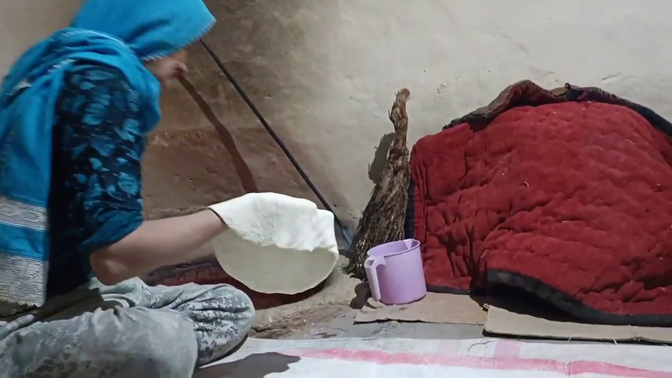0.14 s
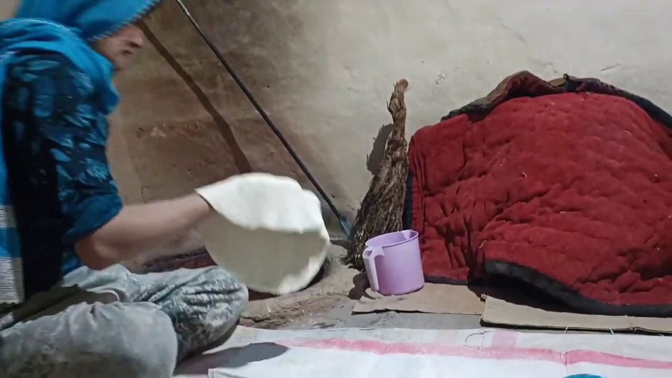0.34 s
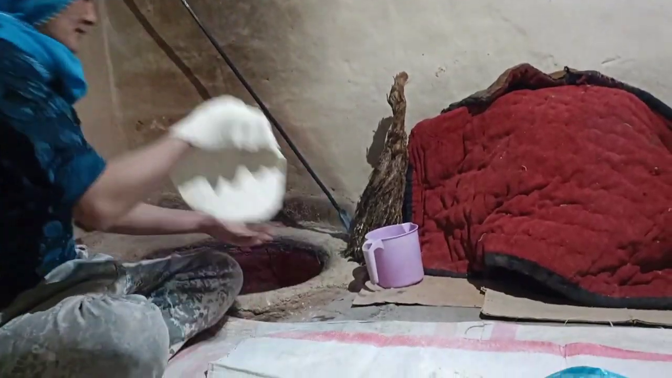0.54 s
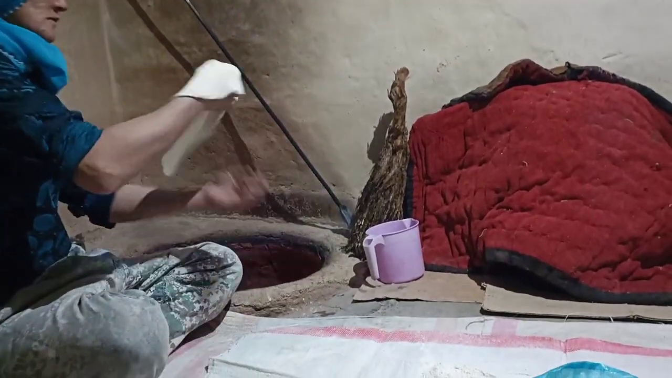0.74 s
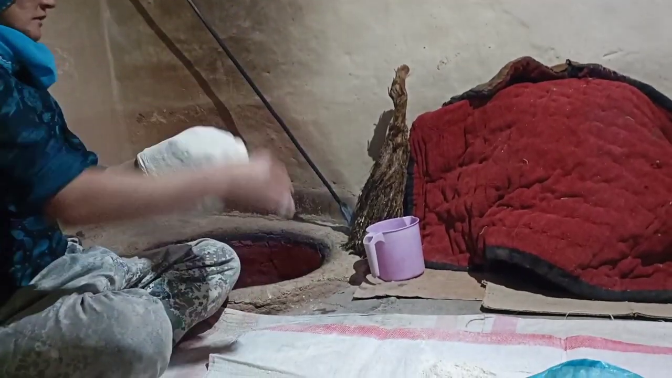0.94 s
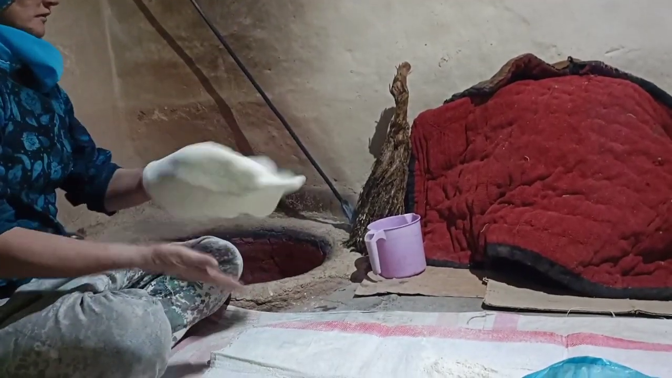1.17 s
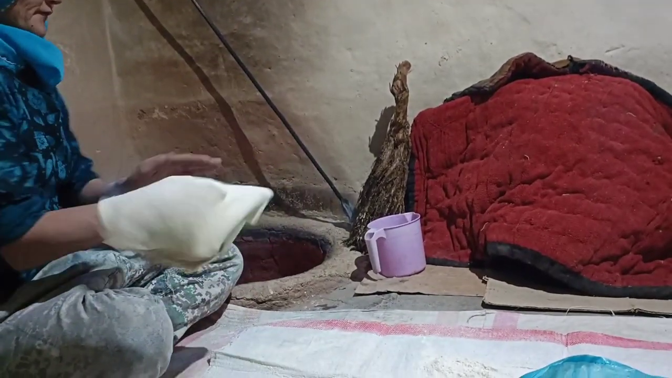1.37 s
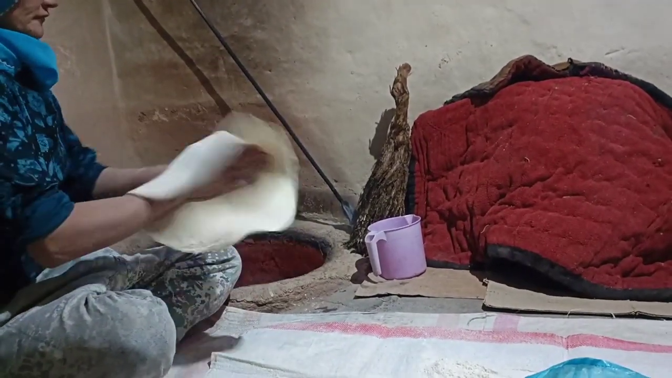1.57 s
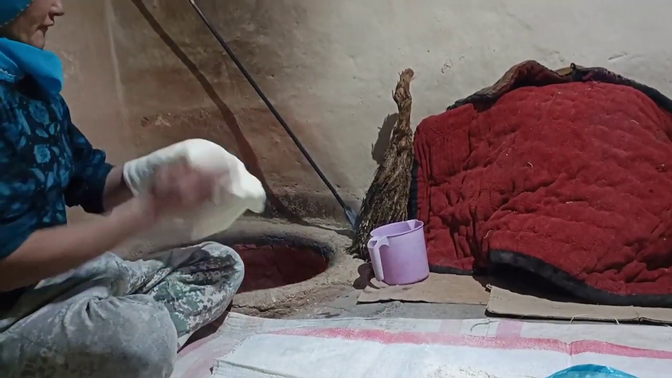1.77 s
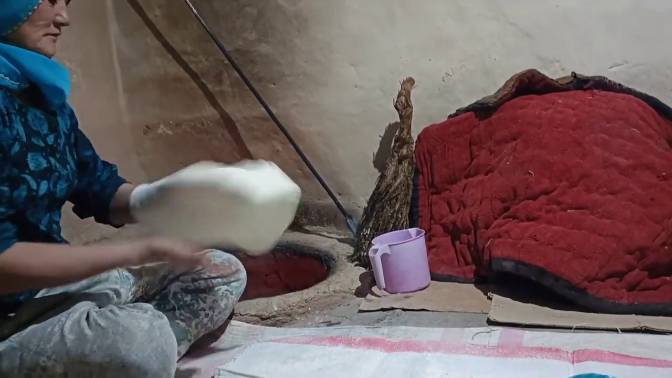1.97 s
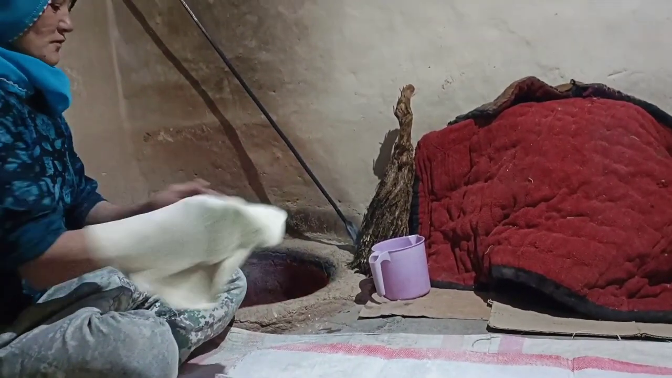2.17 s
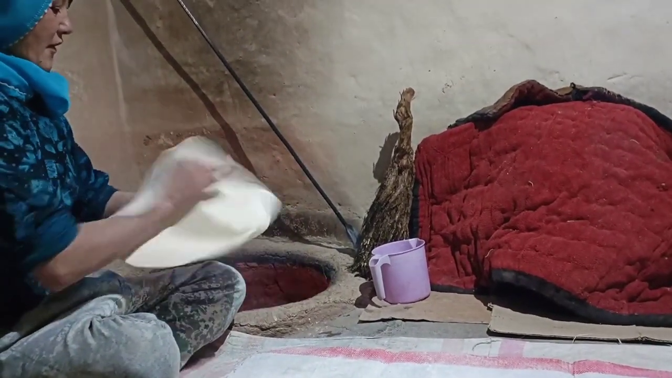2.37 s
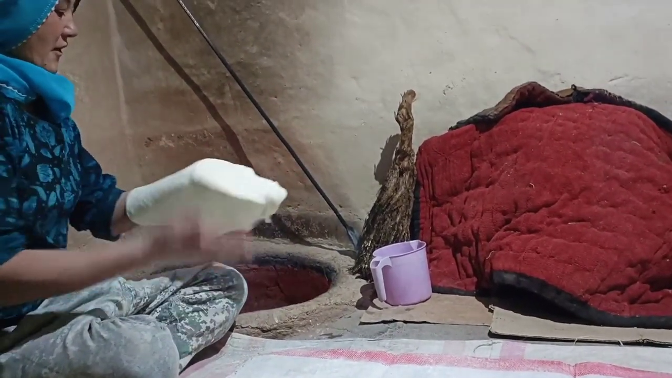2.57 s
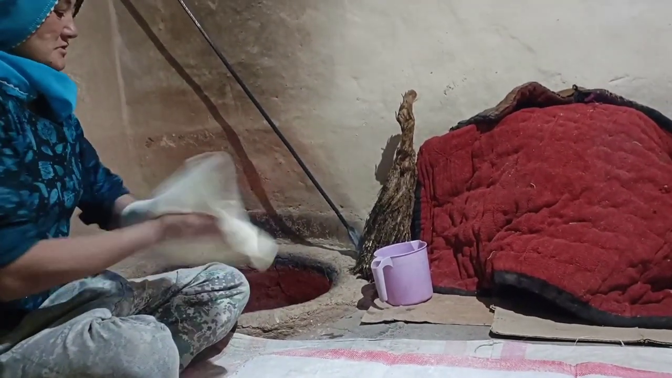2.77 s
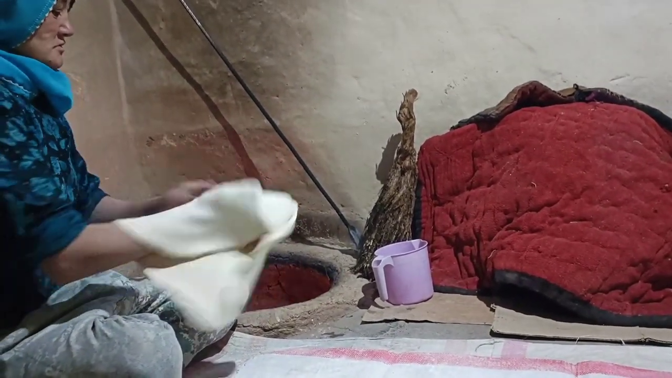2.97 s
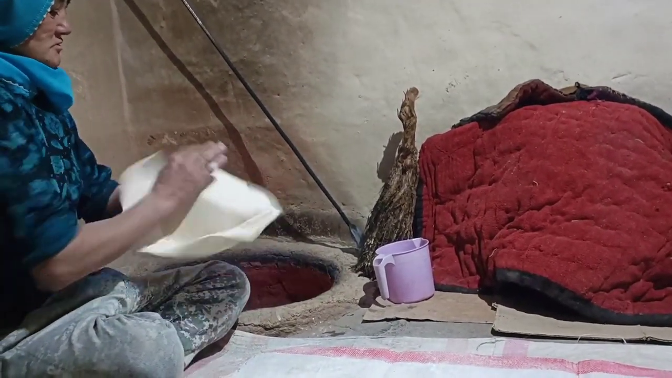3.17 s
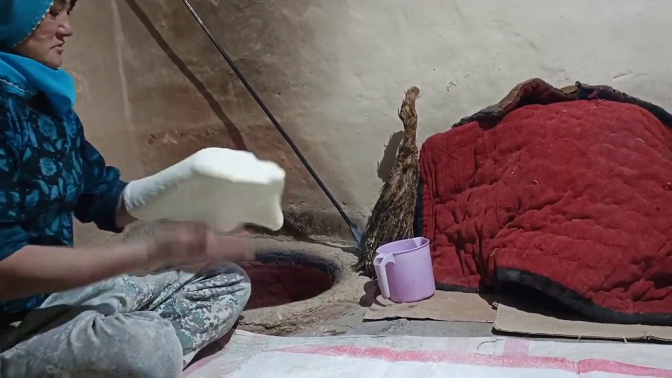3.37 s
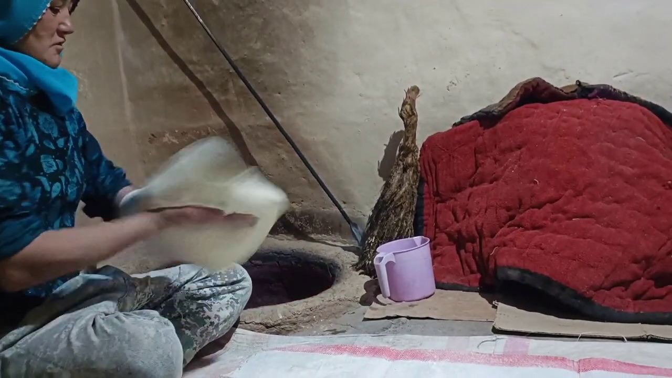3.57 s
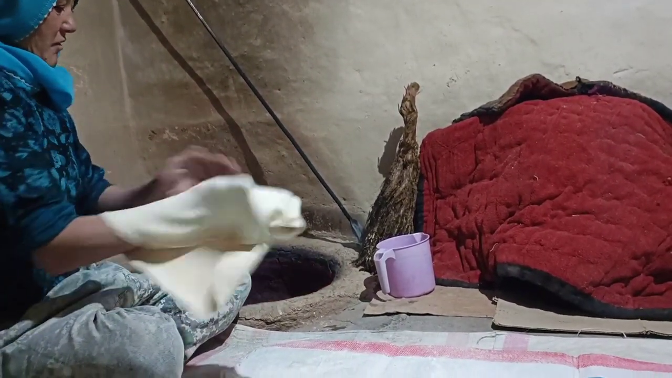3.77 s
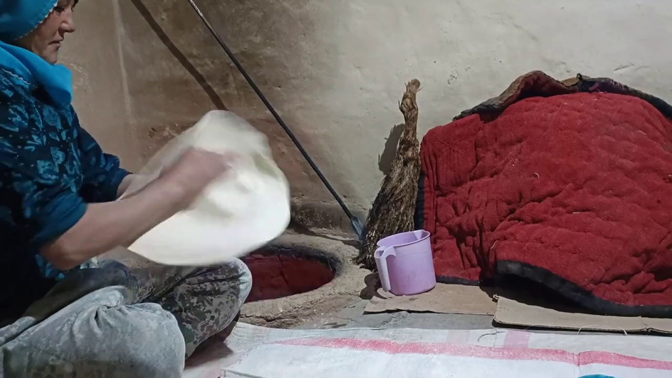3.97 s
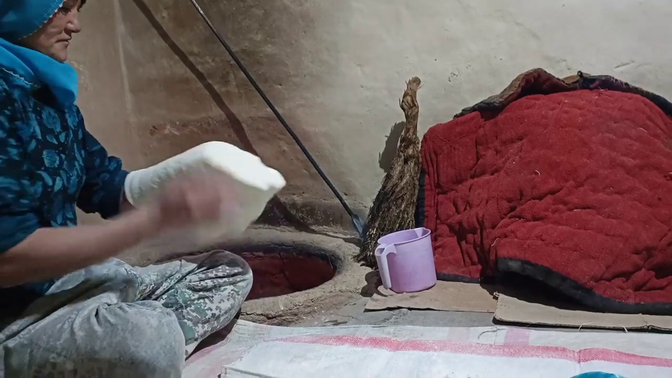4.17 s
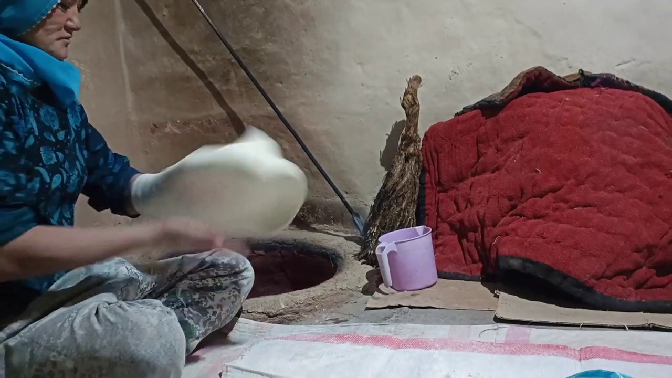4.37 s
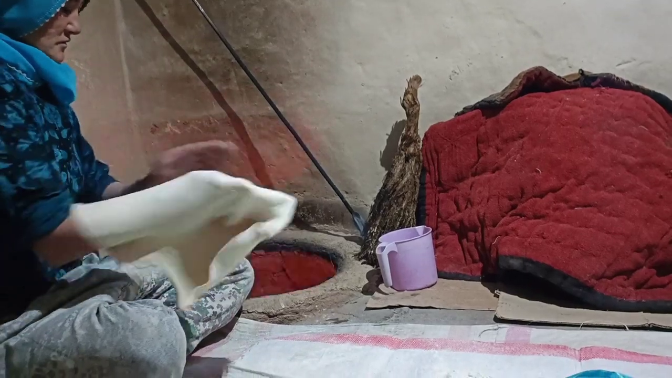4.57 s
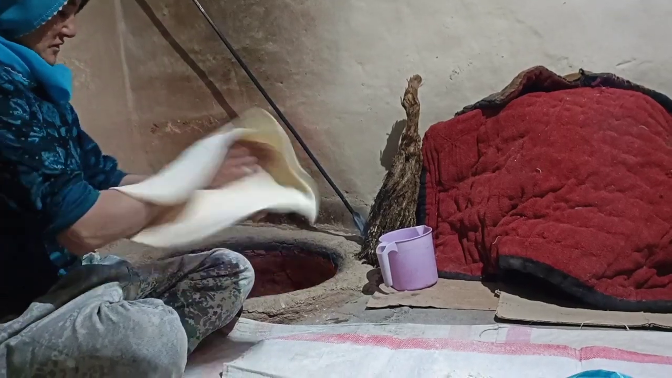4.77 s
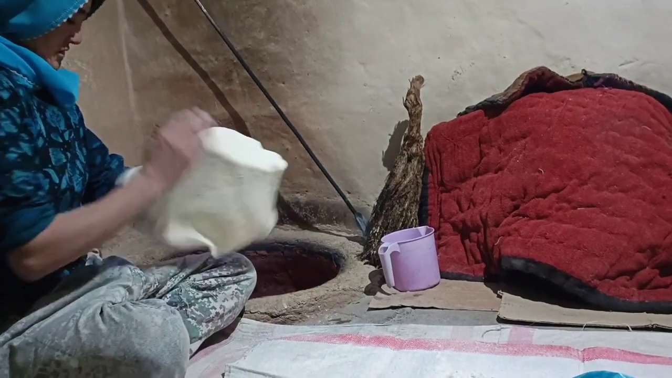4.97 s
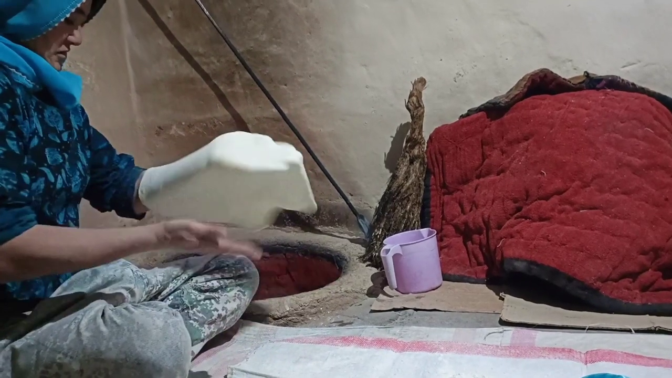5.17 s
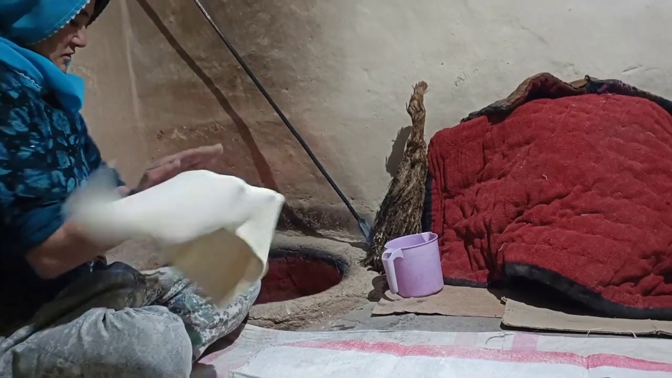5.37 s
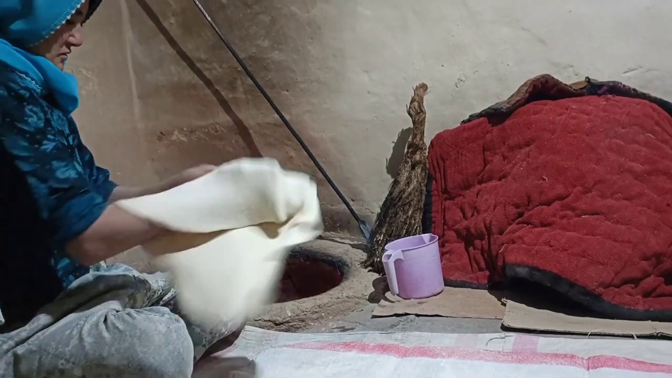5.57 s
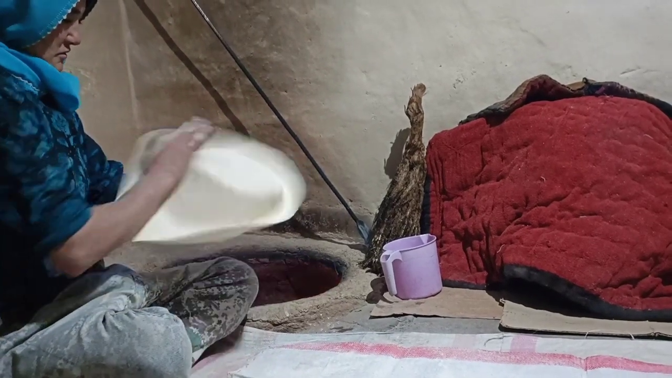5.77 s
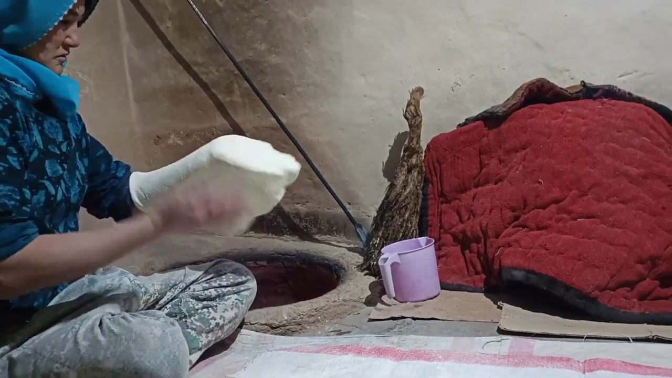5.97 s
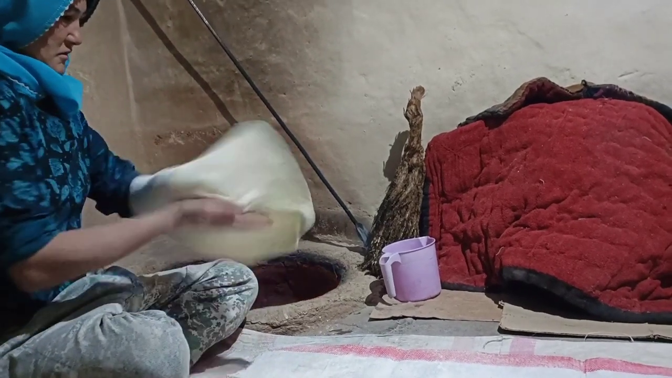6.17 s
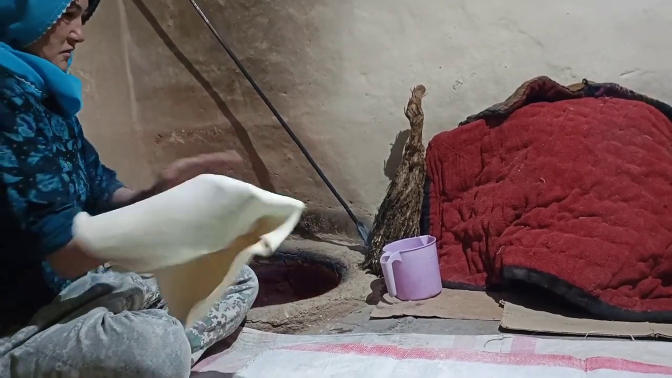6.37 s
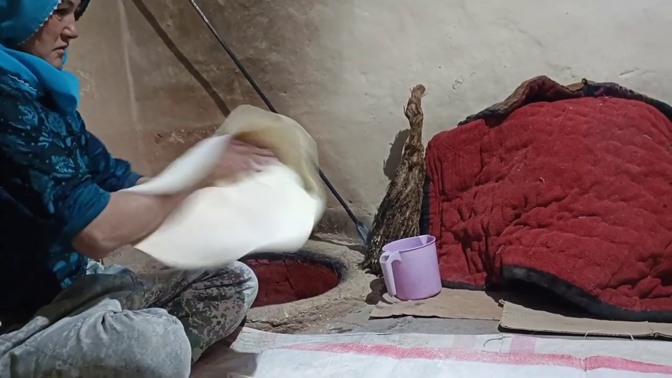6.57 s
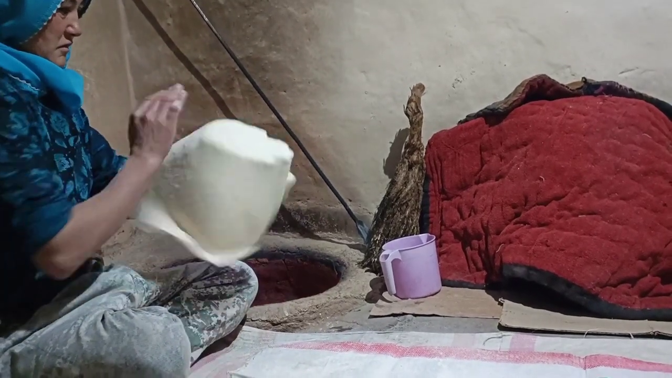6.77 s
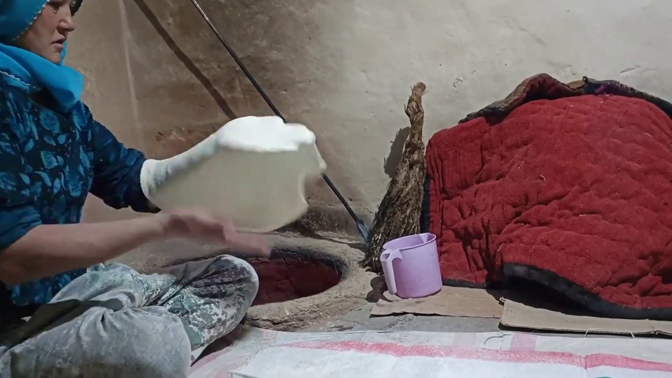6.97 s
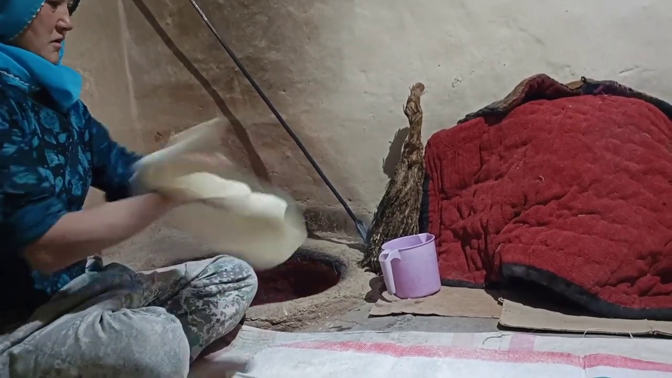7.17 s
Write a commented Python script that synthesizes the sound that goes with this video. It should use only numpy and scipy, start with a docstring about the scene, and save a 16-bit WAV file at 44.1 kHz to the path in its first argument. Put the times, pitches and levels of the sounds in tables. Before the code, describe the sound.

Close stereo pickup in a small, quiet clay-walled room. Floury dough first hisses softly over skin, with tiny sticky ticks; then a flat sheet is tossed between palms. Each round has a cupped pat, a heavier slap with a low thump, and a loose edge flapping after it. Slaps near three and four seconds are loudest and brightest. A clay oven's hollow answers faintly.

```python
"""First comes a fine hiss of floury dough sliding over skin: shaped noise that swells and dies with each stroke.
Then a sheet of bread dough is flung from palm to palm above a clay floor oven in a small room.
A soft catch, a cupped pat, a slap and a flapping edge are each a push of air, many tiny contacts and a short ring.
The hollow of the oven answers some catches with breathy, gliding noise; the still air of the room lies under all."""
import sys
import numpy as np
from scipy import signal
from scipy.fft import rfft, irfft, next_fast_len
from scipy.io import wavfile
from scipy.ndimage import uniform_filter1d

SR = 44100
rng = np.random.default_rng(int(sys.argv[2]) if len(sys.argv) > 2 else 0)


def persist_wave(psi):
    """Save psi, clipped to +-1, as 16-bit WAV."""
    counts = np.round(np.clip(psi, -1, 1) * 32767).astype(np.int16)
    wavfile.write(sys.argv[1], SR, np.atleast_2d(counts).T)


N = 318843  # length of the scene [samples]


def amp(db):
    """Turns decibels into a gain."""
    return 10 ** (np.asarray(db) / 20)


def evened(x):
    """Scales a sound to an average strength (rms) of 1."""
    return x / np.sqrt(np.mean(x ** 2) + 1e-20)


def read(points, hz):
    """Reads a table between its points, on a log-frequency axis."""
    f, value = np.transpose(points)
    return np.interp(np.log(hz + 1), np.log(f + 1), value)


def add(mix, s, sound):
    """Adds a stereo sound into the mix at time s."""
    part = mix[:, max(round(s * SR), 0):][:, :sound.shape[1]]
    part += sound[:, :part.shape[1]]


# how alike the noise is at the two microphones: (frequency [Hz], likeness [0 to 1])
LIKENESS = [(100, .985), (300, .86), (600, .58), (1200, .32), (2500, .2), (16000, .1)]


def diffuse(size):
    """Spectra of white noise at two microphones: nearly the same in the bass, different in the treble."""
    hz = np.fft.rfftfreq(size, 1 / SR)
    left, other = rfft(rng.standard_normal((2, size)))
    same = np.clip(read(LIKENESS, hz), -1, 1)
    right = same * left + np.sqrt(1 - same ** 2) * other
    return hz, np.array([left, right])


def noise(colour):
    """Stereo noise of a given colour, rms 1."""
    size = next_fast_len(N)
    hz, spectra = diffuse(size)
    coloured = irfft(spectra * amp(read(colour, hz)), size)
    return evened(coloured[:, :N])


def wander(rate_hz):
    """Random ups and downs: straight lines between random points, rate_hz points a second."""
    knots = rng.standard_normal(N // 20)
    return np.interp(np.arange(N) * rate_hz / SR, np.arange(len(knots)), knots)


# colour of the still air in the room: (frequency [Hz], level [dB])
STILL_AIR = [(12, -41.5), (20, 7.5), (65, 10.5), (204, 1), (328, 1.5), (459, -9.5), (873, -1.5), (1710, -9),
             (2320, -2.5), (3440, -8.5), (5380, -3.5), (7950, -15), (13900, -11), (16000, -10)]
STILL_AIR_DB = -66.5  # level before the sway


def still_air(sway_db=1, sway_hz=6):
    """The faint rumble and hiss of the room: steady coloured noise whose level sways a little."""
    return noise(STILL_AIR) * amp(STILL_AIR_DB + sway_db * wander(sway_hz))


# colour of the powdery hiss: (frequency [Hz], level [dB])
HISS = [(300, -30.5), (1400, -12), (2400, 0.5), (3500, 3), (5400, 9.5), (6600, 6), (7900, -1), (9200, 4),
        (10400, 2.5), (12500, 9), (14000, 4.5), (16000, -7.5)]
# colour of the duller rub: (frequency [Hz], level [dB])
RUB = [(100, -7), (320, 3), (900, -5), (1600, -2.5), (2400, 1), (3600, 0.5), (5400, 3), (6500, -0.5),
       (8000, -8.5), (12000, -13.5)]
# a hand slides along the dough: (time at full speed [s], hold [s], hiss level [dB], rub level [dB])
STROKES = [(0, 0.049, -47, -58), (.12, 0.036, -83, -58.5), (0.349, 0.018, -49.5, -54.5),
           (0.412, 0.14, -47.5, -59), (.66, 0.05, -68, -71), (.985, .025, -35.5, -64),
           (1.62, 0.0069, -81, -57), (1.842, 0.012, -53.5, -47.5), (1.989, 0.037, -44.5, -47.5),
           (2.16, 0.013, -78, -60.5), (2.566, 0.011, -56, -47), (2.779, 0.045, -52, -76),
           (3.335, 0.017, -53.5, -55), (3.42, 0.0088, -58, -52.5), (3.533, 0.044, -58, -74),
           (4.186, 0.062, -45.5, -45), (4.355, 0.0054, -81, -51), (4.87, 0.048, -57, -63),
           (5.036, 0.029, -51.5, -45.5), (5.212, 0.028, -67.5, -60.5), (5.525, 0.067, -50, -56),
           (5.917, 0.044, -52.5, -47.5), (6.092, 0.065, -56, -59), (6.593, 0.022, -61.5, -65),
           (6.833, 0.038, -50, -44.5), (7.003, 0.02, -68, -60)]
GRIP_DB_PER_S, RELEASE_DB_PER_S = 348, 199.5  # how fast a stroke swells and dies
# around every slap: hold [s], hiss level [dB], rub level [dB]
WINDUP_S, WINDUP_HISS_DB, WINDUP_RUB_DB = 0.025, -63.5, -59.5  # the sheet swishes through the air just before
SKID_S, SKID_HISS_DB, SKID_RUB_DB = 0.11, -68, -64.5  # the sheet skids on the palm after it
SWING_S, SWING_HISS_DB, SWING_RUB_DB = 0.336, -70, -67.5  # sleeves rustle until the arms come to rest


def sliding(grain_db=1.6, grain_hz=350, hiss_left_db=0.3, rub_left_db=1.1):
    """Flour grains and sleeves drag over dough and skin: a fine hiss over a duller rub, both slightly uneven."""
    t = np.arange(0, N, 64) / SR  # coarse time steps are enough for the swells
    left = np.array([[1], [-1]])  # louder on the left, softer on the right
    moves = list(STROKES)
    for s, *_ in SLAPS:
        moves.append((s - WINDUP_S, WINDUP_S, WINDUP_HISS_DB, WINDUP_RUB_DB))
        moves.append((s, SKID_S, SKID_HISS_DB, SKID_RUB_DB))
        moves.append((s, SWING_S, SWING_HISS_DB, SWING_RUB_DB))
    power = 0
    for s, hold, hiss_db, rub_db in moves:
        swell_db = -GRIP_DB_PER_S * np.maximum(s - t, 0)
        fade_db = -RELEASE_DB_PER_S * np.maximum(t - s - hold, 0)
        shape_db = swell_db + fade_db
        power = power + amp([hiss_db + shape_db, rub_db + shape_db]) ** 2
    hiss, rub = (np.interp(np.arange(N) / SR, t, np.sqrt(p)) for p in power)
    sound = noise(HISS) * hiss * amp(left * hiss_left_db)
    sound += noise(RUB) * rub * amp(left * rub_left_db)
    return sound * amp(grain_db * wander(grain_hz))


# ways the oven's air can ring: (multiple of its pitch, level [dB], width [Hz], share of the fading time)
OVEN_MODES = [(1.001, 3.5, 20, 0.98), (2.02, -19, 30, 0.48), (3.8, -7.5, 60, 0.6)]
# the oven's hollow answers, its pitch shifting as its mouth is uncovered:
# (time [s], level [dB], first pitch [Hz], last pitch [Hz], swell [s])
HOLLOWS = [(1.60, -55, 340, 507, 0.038), (1.96, -55.5, 528, 594, 0.014), (2.725, -54.5, 557, 571, 0.011),
           (3.482, -38, 576, 546.5, 0.0048), (4.33, -49, 460, 579, 0.035), (5.20, -55.5, 517, 551, 0.022),
           (6.11, -41.5, 517.4, 541.6, 0.0091), (7.02, -60.5, 555, 549, .011)]
HOLLOW_T60_S = 0.38  # time to fade by 60 dB, before each mode takes its share


def oven(glide_s=0.0499):
    """A breathy ring of the air in the clay pot, noise kept near each mode; the upper modes die first."""
    out, t = np.zeros((2, N)), np.arange(SR // 2) / SR
    for s, db, first_hz, last_hz, swell in HOLLOWS:
        shift_hz = (first_hz - last_hz) * np.exp(-t / glide_s)
        glide = np.exp(2j * np.pi * np.cumsum(shift_hz) / SR)
        for multiple, mode_db, width_hz, share in OVEN_MODES:
            hz, spectra = diffuse(len(t))
            resonance = 1 / (1 + ((hz - multiple * last_hz) / (2 * width_hz)) ** 2)
            # positive frequencies only, so that the glide can shift them all
            breath = np.fft.ifft(spectra * resonance, len(t))
            fade_db = -60 * np.maximum(t - swell, 0) / (HOLLOW_T60_S * share)
            fade = np.minimum(t / swell, 1) * amp(fade_db)
            ring = evened((breath * glide).real * fade)
            add(out, s, ring * np.sqrt(np.mean(fade ** 2)) * amp(db + mode_db))
    return out


# how the room fades, where t60 is the time to fall by 60 dB:
# (frequency [Hz], early level [dB], early t60 [s], late level [dB], late t60 [s])
ROOM = [(80, -14, 0.08, -1.5, 0.84), (197, 4, 0.097, -7, 0.2), (525, 5.5, 0.24, -4.5, 0.91),
        (890, 3.5, 0.18, -7.5, 0.7), (2200, 4.5, 0.2, -9, 0.8), (4660, -3.5, 0.16, -13.5, 0.23),
        (12000, 7.5, 0.19, -28, 0.31)]
# standing waves between the walls: (frequency [Hz], width [Hz], boost [dB])
STANDING = [(80, 20, 2), (141.8, 7.3, 11.5), (378, 23, 5), (705, 25, 10.5), (808, 11.45, 10),
            (1185, 41, 5.5), (1304, 20, 3), (1373, 10, 1.5), (2140, 21, 9), (2226, 33, 1)]
# echoes from floor and walls: (delay at left microphone [s], delay at right microphone [s], level [dB])
ECHOES = [(.0011, 0.0014, -21), (.0023, .00215, -20), (.0047, 0.009, -30), (0.0099, .01, -33),
          (0.0113, 0.012, -24)]


def room(size=32768, build_s=0.0011, tail_db=-1):
    """Reflections for one place of the hands: a few echoes, a quick early tail and a faint long one."""
    t = np.arange(size) / SR
    hz, spectra = diffuse(size)
    spectra *= amp(sum(db / (1 + (2 * (hz - f) / width) ** 2) for f, width, db in STANDING))
    centres, out = [row[0] for row in ROOM], np.zeros((2, size))
    for share, (_, early_db, early_t60, late_db, late_t60) in zip(np.eye(len(ROOM)), ROOM):
        band = irfft(spectra * read(list(zip(centres, share)), hz))
        early = amp(2 * early_db - 120 * t / early_t60) / early_t60
        late = amp(2 * late_db - 120 * t / late_t60) / late_t60
        fade = np.sqrt((early + late) * 2 * np.log(1000) / SR)
        tail = band * fade
        # every place returns the same energy
        out += tail * np.sqrt(np.mean(band ** 2) * np.mean(fade ** 2) / np.mean(tail ** 2))
    out *= amp(tail_db) * (1 - np.exp(-t / build_s))
    for left_s, right_s, db in ECHOES:
        out[[0, 1], [round(left_s * SR), round(right_s * SR)]] += amp(db)
    return out


def heard(sound, reflections, lag_s=0.00011):
    """The direct sound, a little later on the left, and its reflections."""
    paths = reflections.copy()
    paths[[0, 1], [round(lag_s * SR), 0]] += 1
    return signal.fftconvolve(sound[None], paths, axes=1)


def pulse(gain):
    """The sharpest pulse with this spectrum that does not start before its cause (minimum phase)."""
    both_halves = np.r_[gain, gain[-2:0:-1]]
    log_gain = np.log(np.maximum(both_halves, 1e-5))
    return np.fft.ifft(np.exp(np.conj(signal.hilbert(log_gain)))).real


def contact(span, t, rise=0.58, fall=0.94, rush_db=-28, rush_s=0.0023, main_db=5, main_s=0.00037, grit=1.21):
    """Air rushes out, then many small folds touch down around one main impact at t = 0."""
    grains = rng.standard_normal(len(t))
    grains = np.sign(grains) * abs(grains) ** grit  # above 1, grit makes strong grains stand out
    touch = np.exp(-abs(t) / (abs(span) * np.where(t < 0, rise, fall)))
    touch += amp(rush_db) * np.exp(-abs(t) / rush_s)
    touch += amp(main_db) * np.exp(-(t / main_s) ** 2)
    spectrum = rfft(grains * touch)
    smooth_power = uniform_filter1d(abs(spectrum) ** 2, size=61)
    return irfft(spectrum / np.sqrt(smooth_power))  # grainy in time, even in colour


# what a blow is made of, four colours: (frequency [Hz], level [dB])
THUMP = [(20, -9.5), (55, -4), (150, 0.5), (260, 1.5), (600, -24.5), (2000, -48.5)]  # air pushed by the whole sheet
PLOP = [(40, -44), (150, -14), (270, -5.5), (380, -5), (560, -17), (1000, -25.5), (4000, -53.5)]  # soft dough giving way
SMACK = [(100, -35), (500, -8.5), (780, -5.5), (1400, -6), (1750, -15.5), (2300, -4), (3000, -15.5),
         (6000, -28), (16000, -56.5)]  # air squeezed out
CRACK = [(200, -34.5), (1500, -10), (2500, -5), (4500, 1.5), (6300, -6), (8000, -22.5), (12000, -23.5),
         (16000, -28)]  # skin meeting dough
LEAD_S = 0.02  # the contacts and the ring are drawn from this long before a blow lands


def blows(rows, pocket_width_hz=190, pocket_room_db=-4.5, pocket_lead_s=0.001552, push_lead=0.35, balance_db=1.0):
    """Every blow: a dull push of air, a spatter of contacts, and the short ring of the air caught under the palm."""
    hz, t = np.fft.rfftfreq(4096, 1 / SR), np.arange(4096) / SR - LEAD_S
    out, sides = np.zeros((2, N)), amp([[balance_db], [-balance_db]])
    for s, thump_db, plop_db, smack_db, crack_db, ring_db, ring_hz, span, room_db in rows:
        walls = room()
        thump, plop = amp(thump_db + read(THUMP, hz)), amp(plop_db + read(PLOP, hz))
        push = pulse(np.hypot(thump, plop))
        # hands shadow the direct sound and leave more room, less so in the bass
        add(out, s - push_lead * span, heard(push, walls * amp(room_db / 2)))

        smack, crack = amp(smack_db + read(SMACK, hz)), amp(crack_db + read(CRACK, hz))
        skin = pulse(np.hypot(smack, crack))
        spatter = signal.fftconvolve(skin, contact(span, t))
        add(out, s - LEAD_S, sides * heard(spatter, walls * amp(room_db)))

        # the pocket swells as the palm closes and dies within a few cycles
        age = np.maximum(t + pocket_lead_s, 0)
        swell = age ** 2 * np.exp(-2 * np.pi * pocket_width_hz * age)
        ring = 2 * swell / swell.sum() * np.sin(2 * np.pi * ring_hz * age)
        add(out, s - LEAD_S, amp(ring_db) * sides * heard(ring, walls * amp(pocket_room_db)))
    return out


# Each function below lists its blows for blows(), as rows of
# (time, thump dB, plop dB, smack dB, crack dB, ring dB, ring Hz, contact time s, room dB).
# The levels in their tables are relative; the "_db" settings shift them.

# sticky dough peels off a finger: (time [s], level [dB])
TICKS = [(.695, -30), (.812, -28.5), (1.172, -21), (3.582, -12.5)]


def ticks(body_db=-25, pocket_hz=800, contact_s=0.0008, room_db=-6):
    """A thin crack with almost no air behind it."""
    rows = []
    for s, db in TICKS:
        body = db + body_db
        rows.append((s, body, body, body, db, body, pocket_hz, contact_s, room_db))
    return rows


# the sheet settles softly on a hand: (time [s], weight [dB], touch [dB], air pocket pitch [Hz])
CATCHES = [(1.04, -11, -16, 1080), (2.722, -1, -8, 584), (3.48, 11, 1.5, 645), (4.317, 3.5, -11, 850),
           (4.352, -6, -10.5, 800), (5.164, -3.5, -16, 1140), (5.197, 2, -10, 924), (5.926, 7, -9.5, 714),
           (6.09, -5, -13.5, 750), (6.109, 10.5, -2.5, 715), (6.822, 5.5, -9.5, 860),
           (7.013, -9.5, -18, 582)]


def catches(thump_db=-19, crack_db=-11, pocket_db=5, contact_s=0.00384, room_db=5):
    """A yielding hand gives a dull plop."""
    return [(s, weight + thump_db, weight, touch, touch + crack_db, touch + pocket_db, hz, contact_s, room_db)
            for s, weight, touch, hz in CATCHES]


# a cupped hand pats the sheet: (time [s], weight [dB], strength [dB], air pocket pitch [Hz])
PATS = [(1.074, -3, 3.5, 940), (1.83, 2.5, 11.5, 1054), (2.547, 5.5, 15.5, 974), (3.3139, 8, 20.5, 1064),
        (4.16, 4, 13.5, 1000), (5.02, 2.5, 10.5, 1052), (5.903, -11, 4.5, 955), (6.808, -5.5, 7, 934)]
DRY_PER_DB = 0.4652  # the firmer the blow, the more its direct sound stands out of the room [dB per dB]


def pats(thump_db=-9, smack_db=-19.0, crack_db=-27, contact_s=0.0036, room_db=14.5):
    """The air under the cupped palm rings above all else; the hand hides the direct sound."""
    return [(s, weight + thump_db, weight, db + smack_db, db + crack_db, db, hz, contact_s,
             room_db - DRY_PER_DB * db) for s, weight, db, hz in PATS]


# the loose edge whips round about a tenth of a second after a blow:
# (time [s], weight [dB], snap [dB], air pocket pitch [Hz])
FLAPS = [(1.544, -0.5, -8, 850), (1.933, 12, -5.5, 726), (2.3501, -1.5, 0.5, 1770), (2.654, -0.5, -21, 880),
         (3.091, -6, -6, 910), (3.8802, 12.5, 9.5, 950), (4.262, 2.5, -12, 780), (4.7549, 6, -11.5, 1050),
         (5.6251, 10, -1, 833), (6.534, -2.5, -21.5, 825)]
SNAP_S = 0.001  # contact time of the edge
THUMP_DB_PER_S = 1.5  # the sheet spreads as it is worked and pushes ever more air


def flaps(thump_db=-22, crack_db=1, pocket_db=2, room_db=-3):
    """The light edge gives a short, bright snap with little bass."""
    return [(s, weight + thump_db + THUMP_DB_PER_S * s, weight, snap, snap + crack_db, snap + pocket_db, hz,
             SNAP_S, room_db - DRY_PER_DB * snap) for s, weight, snap, hz in FLAPS]


# lighter smacks close to a slap or a flap, a little before or after it:
# (time [s], weight [dB], smack [dB], air pocket pitch [Hz])
FOLDS = [(2.243, 8, 8, 850), (2.357, -12.5, -4.5, 2400), (2.996, -1, 12, 2290), (3.007, 13.5, 9, 2220),
         (3.791, 5, 17, 1610)]


def folds(thump_db=-5, crack_db=-14, pocket_db=3, contact_s=0.003, room_db=-2):
    """A fold touches down with a smack and a short ring, its crack well below its smack."""
    return [(s, weight + thump_db, weight, smack, smack + crack_db, smack + pocket_db, hz, contact_s, room_db)
            for s, weight, smack, hz in FOLDS]


# the whole sheet lands on a palm: (time [s], weight [dB], smack [dB], crack [dB],
# air pocket level [dB], air pocket pitch [Hz], contact time [s])
SLAPS = [(1.482, 11, 5.5, 4.5, 8, 804, 0.0045), (2.249, 12, 10.5, 12, 12.5, 887, 0.0018),
         (2.986, 15, 22, 13.5, 26, 1350, 0.0039), (3.779, 16.5, 22.5, 0, 27, 1430, 0.0027),
         (4.654, 13.5, 8.5, 2, -1, 782, 0.0049), (5.509, 12.5, 7.5, 4, -2, 855, 0.0035),
         (6.417, 12.5, 8, 2.5, 8.5, 690, 0.0032)]


def slaps(thump_db=-11.5, room_db=3):
    """The flat sheet pushes much air: a deep thump goes with its weight and size."""
    return [(s, weight + thump_db + THUMP_DB_PER_S * s, weight, smack, crack, pocket, hz, span,
             room_db - DRY_PER_DB * smack) for s, weight, smack, crack, pocket, hz, span in SLAPS]


def scene():
    """Room air, sliding, the oven's answer and all the blows."""
    dough = ticks() + catches() + pats() + flaps() + folds() + slaps()
    return still_air() + sliding() + oven() + blows(dough)


def record(dry, low_cut_hz=36, edge_hz=16200):
    """The microphone's bass cut and the recorder's band limit."""
    bass_cut = signal.butter(2, low_cut_hz, "highpass", fs=SR, output="sos")
    dry = signal.sosfilt(bass_cut, dry)
    band_limit = signal.firwin(511, edge_hz, window=("kaiser", 9), fs=SR)
    return signal.oaconvolve(dry, band_limit[None], "same")


dry = scene()
out = record(dry)
persist_wave(out)
```